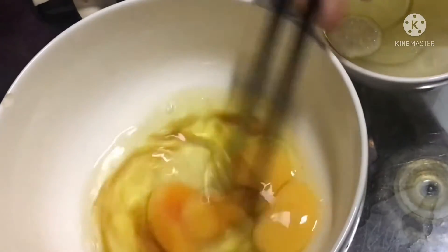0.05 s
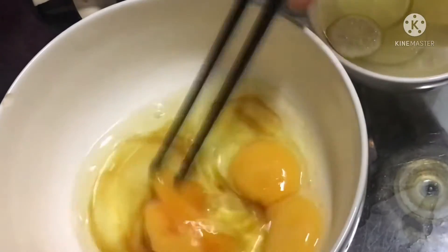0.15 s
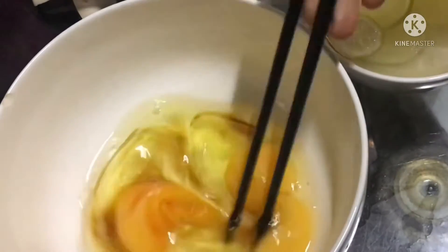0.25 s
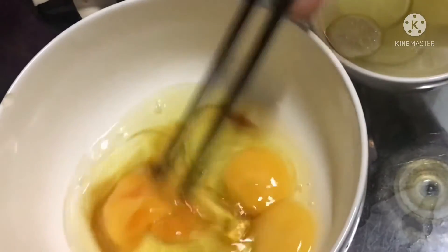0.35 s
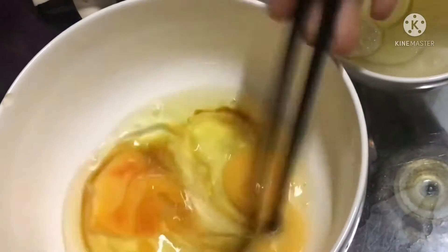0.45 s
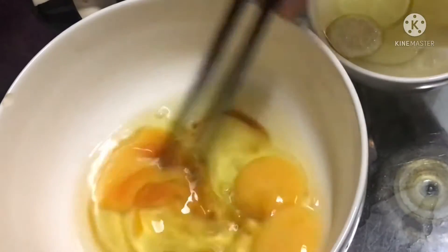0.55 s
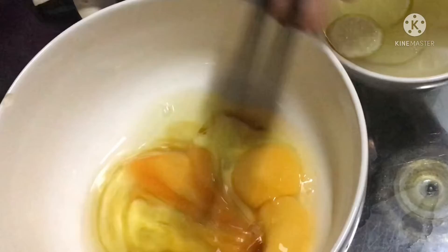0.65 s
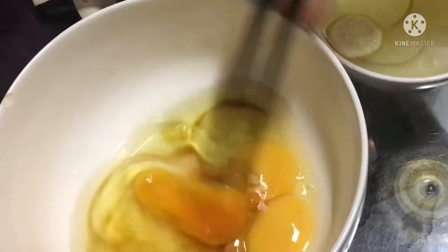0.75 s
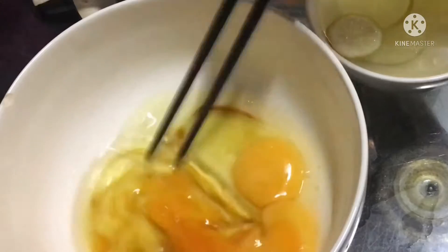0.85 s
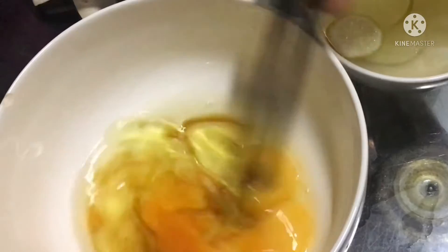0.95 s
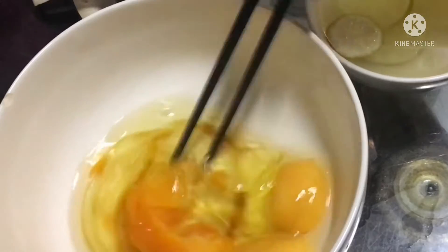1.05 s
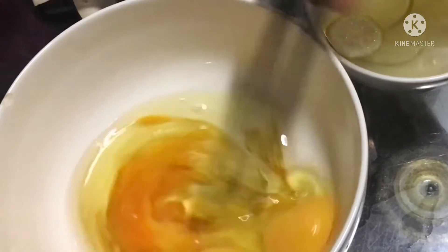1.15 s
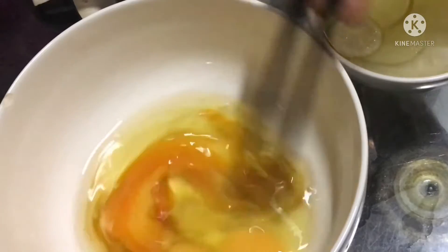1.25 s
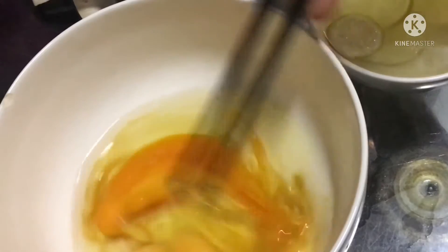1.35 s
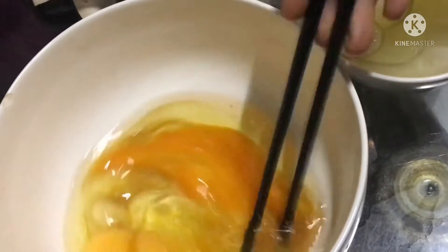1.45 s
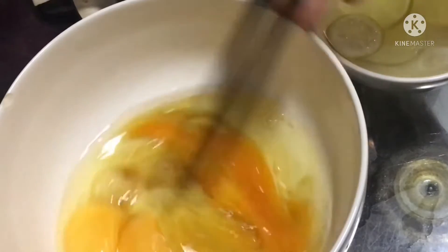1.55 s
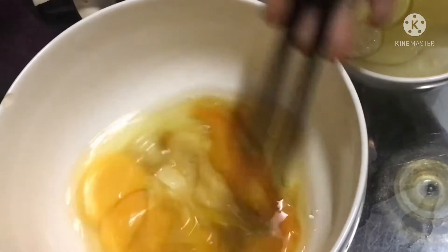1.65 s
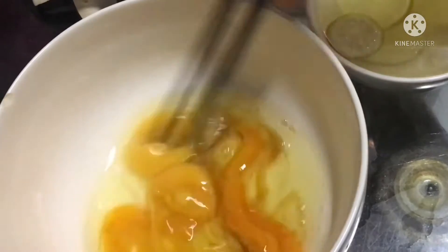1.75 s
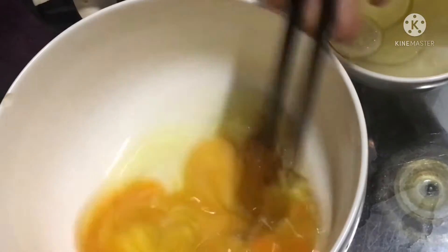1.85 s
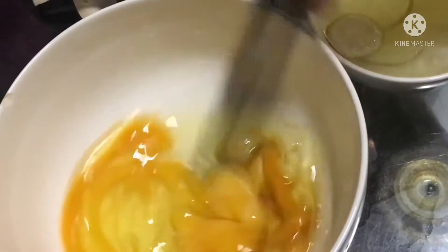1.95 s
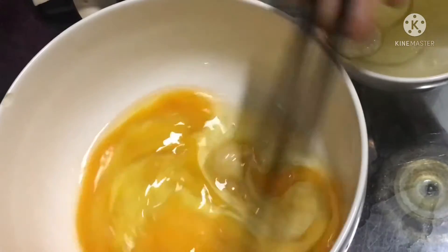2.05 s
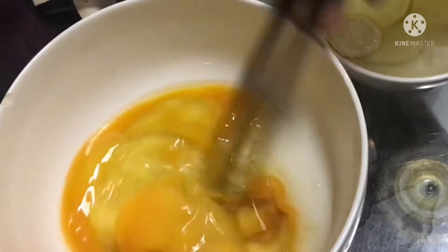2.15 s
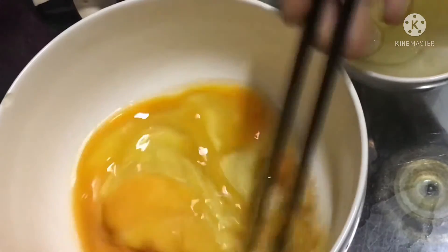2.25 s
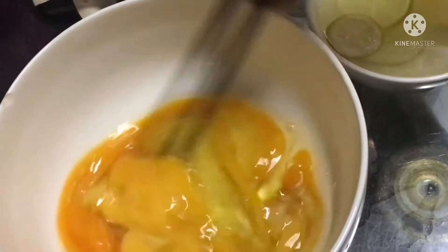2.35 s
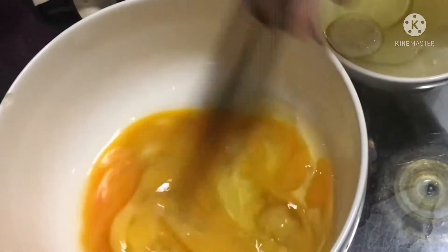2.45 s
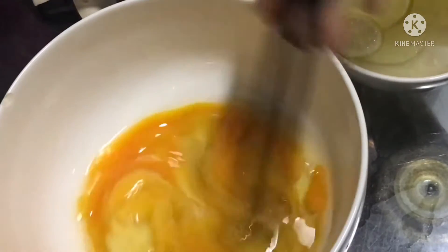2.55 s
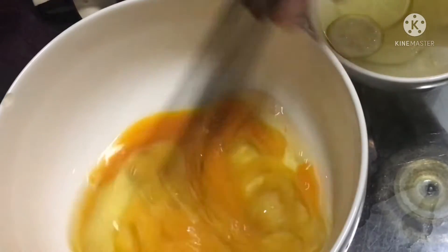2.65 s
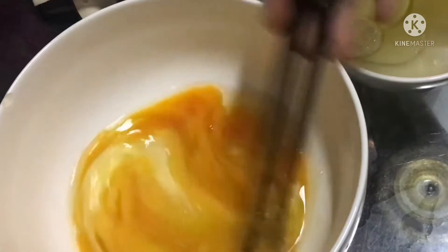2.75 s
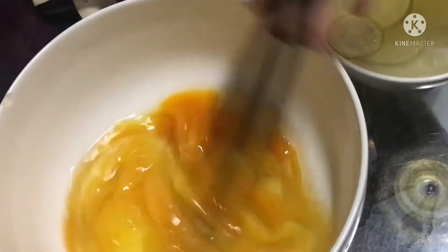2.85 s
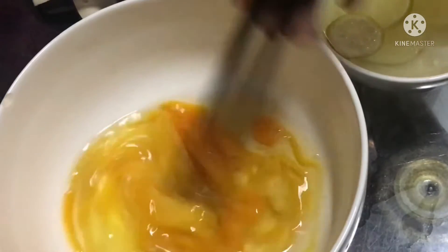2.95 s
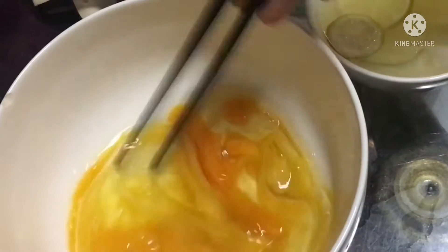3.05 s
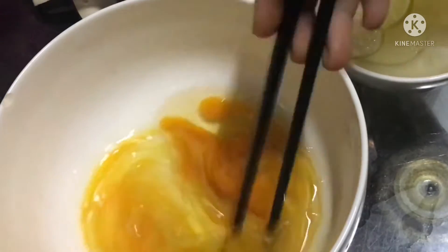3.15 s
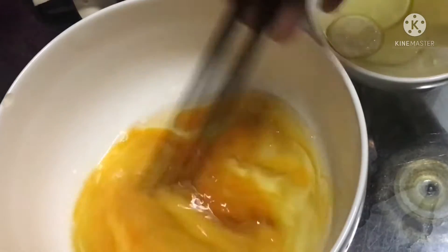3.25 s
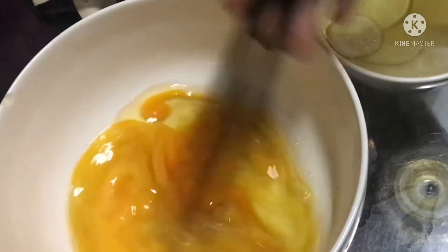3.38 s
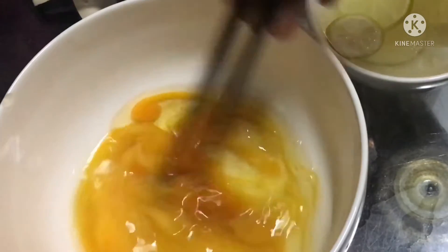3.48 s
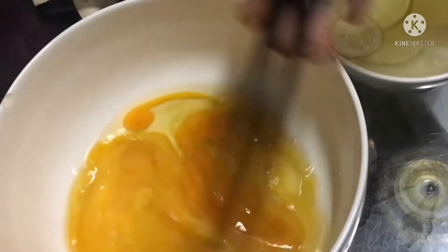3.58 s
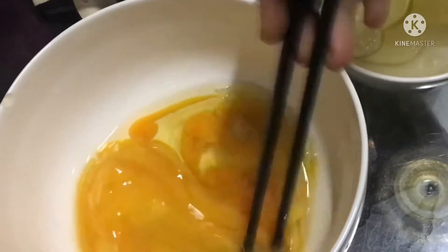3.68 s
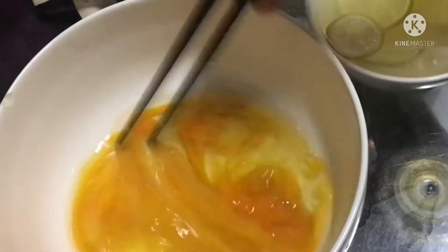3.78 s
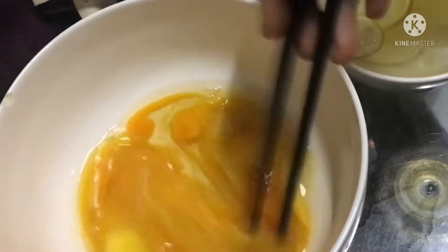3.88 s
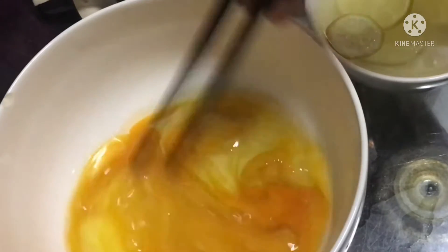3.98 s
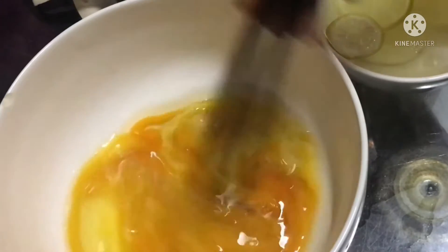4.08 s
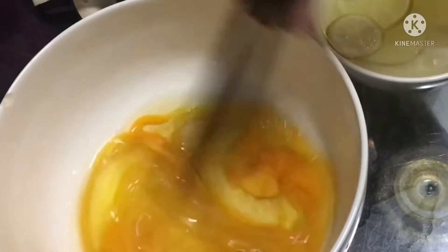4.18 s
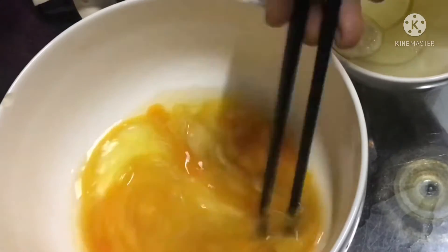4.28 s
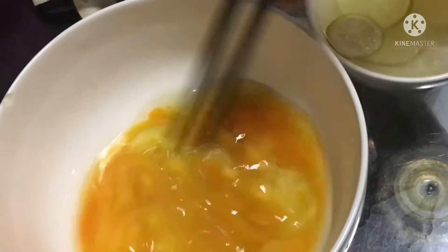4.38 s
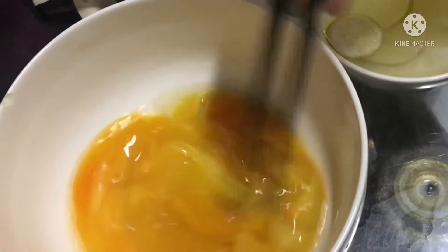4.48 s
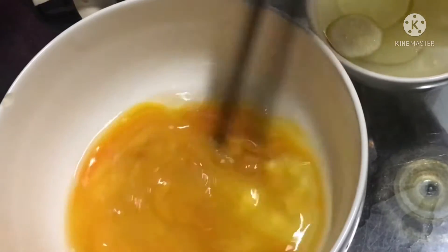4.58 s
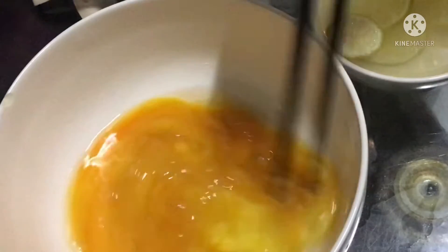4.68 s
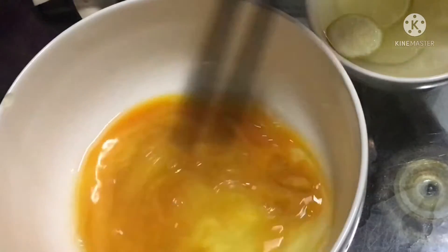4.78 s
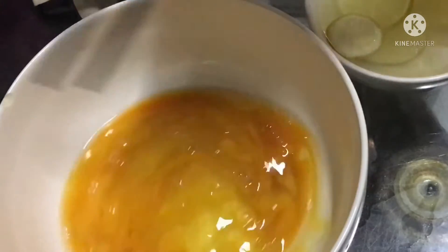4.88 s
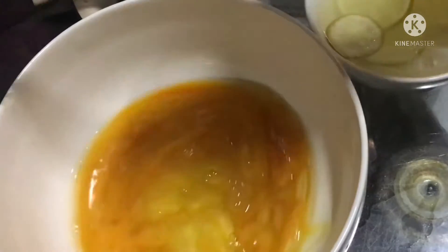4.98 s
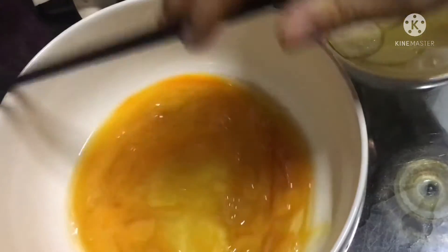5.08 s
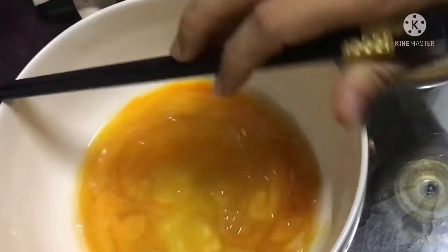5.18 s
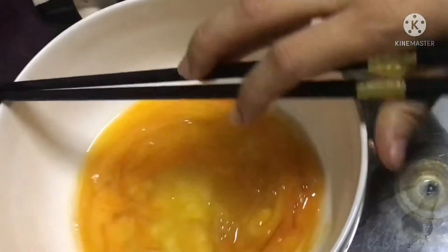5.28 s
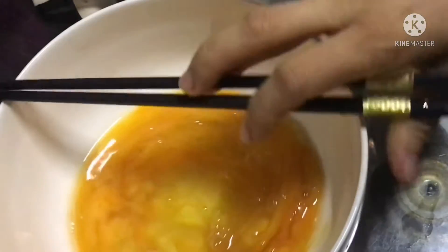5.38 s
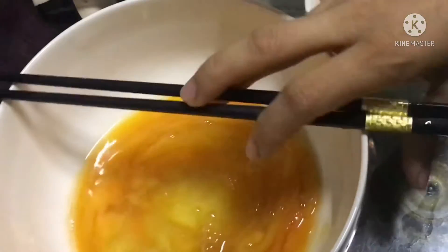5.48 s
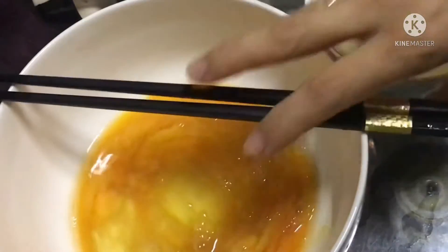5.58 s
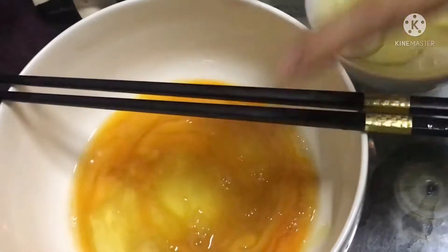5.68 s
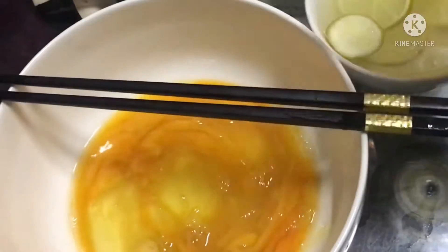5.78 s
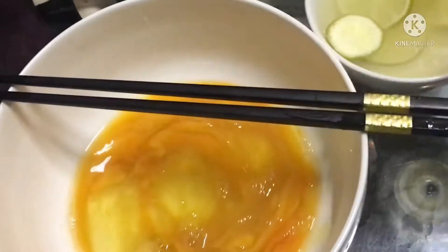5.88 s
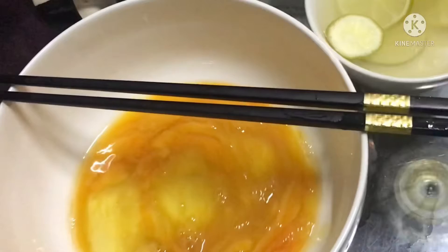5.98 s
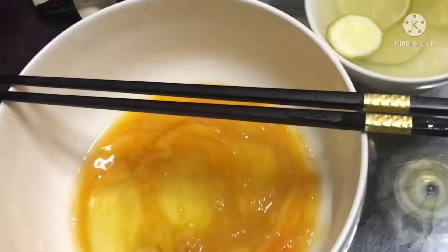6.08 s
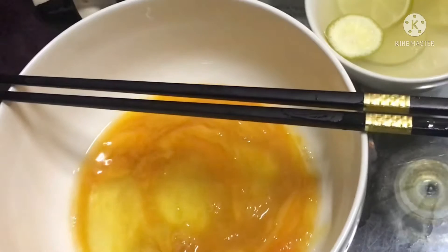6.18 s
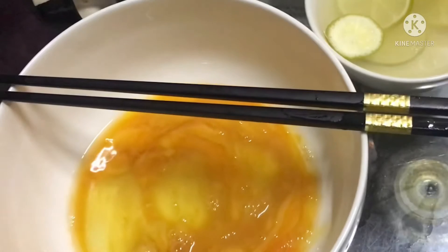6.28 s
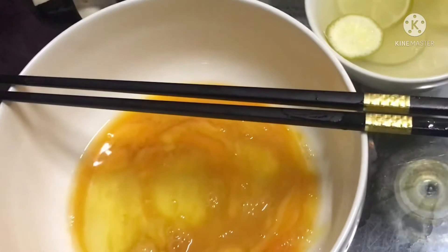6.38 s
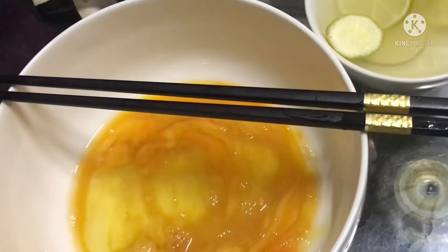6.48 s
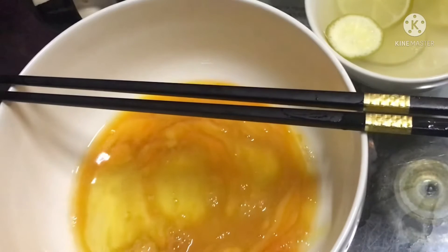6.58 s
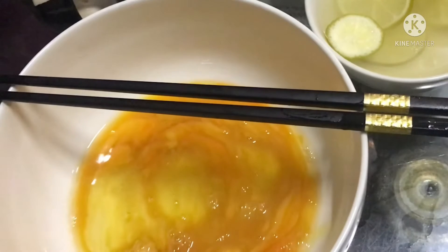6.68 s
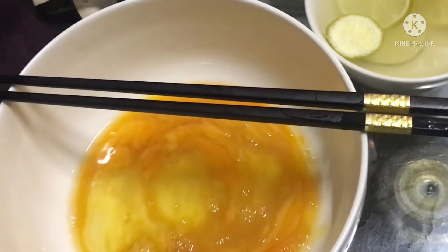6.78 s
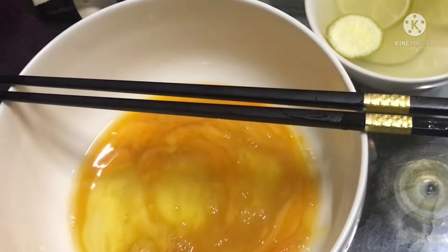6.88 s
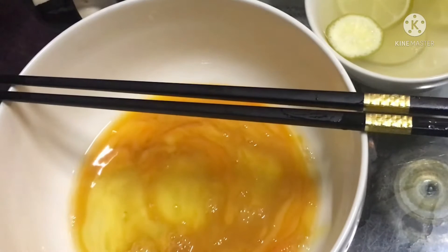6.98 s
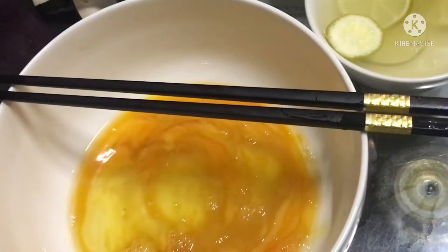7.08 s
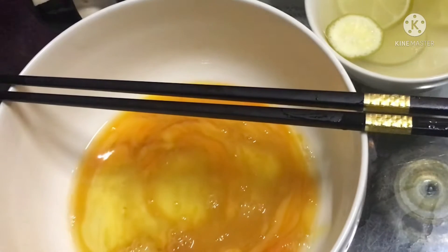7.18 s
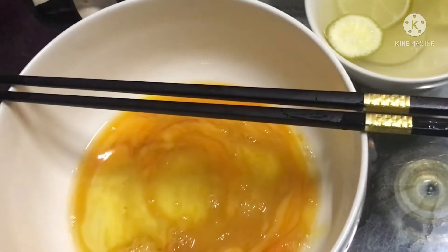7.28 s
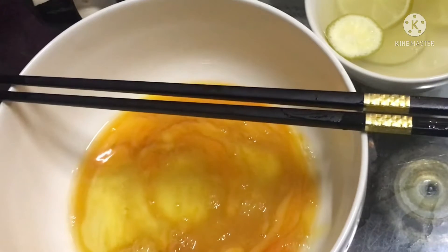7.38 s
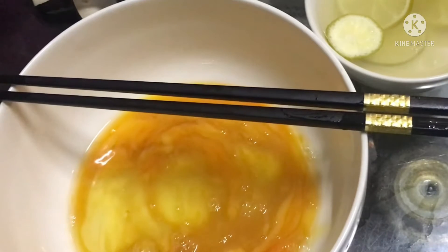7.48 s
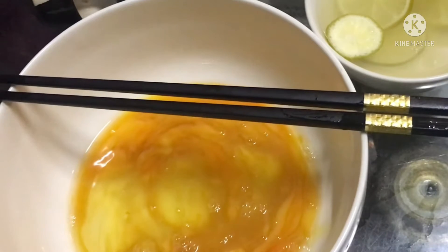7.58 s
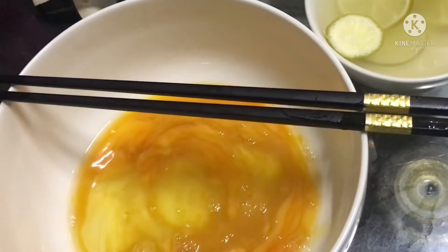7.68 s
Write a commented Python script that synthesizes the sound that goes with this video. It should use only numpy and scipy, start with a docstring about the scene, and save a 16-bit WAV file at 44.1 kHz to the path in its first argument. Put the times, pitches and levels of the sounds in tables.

```python
"""Beating eggs with chopsticks

Small kitchen, microphone close to a ceramic bowl. Two chopsticks beat five or six strokes a second,
clacking on the wall one just after the other, while bubbles plop in the egg. The sticks are then
laid across the rim. A few dull bumps follow further off; a low room hum lies under it all."""
import sys
import numpy as np
from scipy import signal
from scipy.fft import rfft, irfft
from scipy.io import wavfile
from scipy.ndimage import uniform_filter1d

SR = 44100
rng = np.random.default_rng(int(sys.argv[2]) if len(sys.argv) > 2 else 0)


def file_out(sig):
    """Save sig as 16-bit WAV at sys.argv[1]."""
    # one column per channel
    cols = np.atleast_2d(sig).T
    # limit, then scale
    lim = np.clip(cols, -1, 1)
    pcm = np.round(lim * 32767).astype(np.int16)
    wavfile.write(sys.argv[1], SR, pcm)


N = 340893
SIZE = 16384  # samples in one event
T = np.arange(SIZE) / SR
HZ = np.maximum(np.arange(SIZE // 2 + 1) * SR / SIZE, 1)

# spectrum of the room air: f/Hz, relative level/dB
ROOM_SPECTRUM = [(20, -25.5), (40, 4), (70, 2), (115, -9.5), (290, -5), (640, -8.5), (1200, -10),
                 (2000, -19.5), (3000, -26.5), (5000, -32.5), (8800, -31.5), (10500, -37.5), (12000, -34.5),
                 (16000, -43.5)]
# appliance hum: f/Hz, rms level/dB
HUM_TONES = [(42, -69.5), (141, -65), (249, -64.5), (297, -60)]
# how much egg is stirred: t/s, relative level/dB
STIRRING = [(0, -3), (2.4, 0), (4.5, 0), (4.95, -40)]
# strokes on the bowl wall; the spot they hit sets knock and edge: t/s, relative level/dB,
# second stick's lag/s, second against first/dB, hollow knock near 900 Hz/dB, edge near 6.5 kHz/dB
BEATING_STROKES = [(-.065, -13.5, .002, 0, -6.5, 3.5), (0.101, -14, .0019, 0, -5.5, -2),
                   (.277, -14, 0.0024, 1, -4.5, -4), (.446, -16.5, .0042, 1, 0.5, -7.5),
                   (0.6374, -14, 0.0052, 1, -3.5, 0.5), (.8073, -15, 0.0025, 5, -0.5, -1.5),
                   (0.9651, -12, 0.0025, -2.5, -1, -1.5), (1.1293, -12, .0052, 3, 0, -0.5),
                   (1.3026, -12, 0.0019, -9, 2, -4.5), (1.482, -13.5, 0.0041, 2.5, -3.5, -1),
                   (1.664, -18, .001, 2, 0.5, 1), (1.8476, -15.5, 0.0047, -5.5, 2, 6.5),
                   (2.0391, -12, 0.0034, 3, -6, -1.5), (2.228, -19, 0.00091, -7.5, 2.5, -5.5),
                   (2.419, -13, 0.0047, -1.5, -3.5, -2.5), (2.603, -12.5, .0018, -4, -1, 0.5),
                   (2.7913, -16, .0049, -2.5, 1, 4), (2.9865, -18, 0.0076, -6, 2.5, -2),
                   (3.175, -12, .0038, -3.5, 0.5, 2.5), (3.3551, -13.5, 0.0016, 9.5, -2.5, -0.5),
                   (3.542, -12, .0021, 0.5, -2, -0.5), (3.7269, -11.5, 0.0015, 10, -2, -2),
                   (3.9139, -10.5, 0.003, -2.5, -2.5, -4), (4.1177, -12, 0.0016, -5, 3, 4),
                   (4.3006, -13.5, 0.0011, 0.5, 3, -1), (4.4882, -15, .001, 3.5, 0, -0.5),
                   (4.6749, -9.5, 0.003, 5, 1, 1.5)]
# damped resonances of gripped sticks against the filled bowl: f/Hz, width/Hz, relative level/dB
CLACK_RESONANCES = [(382, 37, -10.5), (467, 18, 0.5), (776, 19, 0), (919.3, 33, 1), (1001, 34.5, 4),
                    (1594, 36, -15.5), (1633, 90, -1), (2245, 374, -1.5), (2507, 43, -5), (3213, 470, -14),
                    (3573, 444, 2), (4370, 470, -6.5), (5850, 270, -3.5), (6650, 520, 3), (8080, 450, -2),
                    (9025, 182, -2), (11020, 1000, -9), (12540, 2200, -17), (15000, 240, -4.5)]
# ringing modes of the bowl: f/Hz, relative level/dB, t60/s
BOWL_MODES = [(901, -5, .18), (1005, -5, .21), (1637, -10, .25), (2164, -10, .16), (2227, -3, .2),
              (2363, -12, .2), (2520, -10, .16), (3100, -11, .15), (3520, -11, .14), (3833, -13, .2),
              (4000, -13, .2), (4330, -12, .21), (6358, -12, .18), (6611, -12, .22), (6760, -11, .22),
              (8230, -14, .22), (9200, -12, .22), (9362, -13, .2)]
# spectrum of a wet smack: f/Hz, relative level/dB
SMACK_SPECTRUM = [(400, -28.5), (1200, 3.5), (3500, -1.5), (4400, 4.5), (5100, -6), (7000, -1.5),
                  (10000, -10.5), (16000, -11.5)]
# the larger air pockets in the egg: t/s, relative level/dB, f/Hz
AIR_POCKETS = [(0.5048, -23, 1604), (.5154, -25, 4080), (0.543, -32.5, 3500), (1.0983, -30, 3950),
               (1.7626, -30, 3560), (1.943, -21.5, 3570), (2.2897, -23, 945), (2.3366, -22, 1630),
               (2.3718, -28.5, 1910), (2.5072, -23.5, 3150), (2.73, -19.5, 1940), (2.941, -31.5, 3370),
               (3.2482, -14, 3336), (3.4565, -15, 1870), (3.4584, -20, 3190), (3.6105, -21, 1070),
               (3.6714, -32, 1370), (3.77, -12, 3180), (4.1953, -20, 1045), (4.3785, -28, 1300)]
# sticks grazing the wall and each other on the way back: t/s, relative level/dB, stick's ring peak/dB
RETURN_GRAZES = [(1.4295, -38, -47), (1.7211, -30, -17), (2.0824, -25.5, -11.5), (2.4847, -32, -28.5),
                 (2.657, -23.5, -21.5), (2.848, -23.5, -20), (3.4053, -29.5, -25), (3.5964, -24, -21),
                 (3.7711, -23, -29), (3.9712, -22.5, -27), (4.1824, -28, -43), (4.38, -28, -30)]
# sticks laid on the rim and settling, and last a faint high tick at 7.3 s: t/s, relative level/dB, hardness/dB
RIM_LANDINGS = [(5.184, -32, -2), (5.215, -25, 4), (5.2442, -31.5, 5.5), (5.268, -34.5, 1),
                (5.431, -51, -19.5), (5.4868, -29.5, -1.5), (5.4955, -33, -3), (5.51, -29.5, -6.5),
                (5.517, -38.5, -12.5), (5.527, -37.5, -15.5), (5.671, -54.5, -19), (5.7127, -56, -23),
                (7.293, -63, 6)]
# resonances of loose sticks on the rim: f/Hz, width/Hz, relative level/dB
RIM_RESONANCES = [(628, 12, 11), (765, 13, 6), (947, 290, 0.5), (1600, 460, 1), (2150, 51, 4.5),
                  (2950, 104, 3.5), (4180, 620, -0.5), (5380, 150, 4), (6400, 720, 0), (8230, 1940, 0),
                  (9200, 850, -12), (12800, 3500, -8.5)]
# bending modes of a loose chopstick: f/Hz, relative level/dB, t60/s
STICK_MODES = [(745, -8, .35), (1604, 0, .28), (2869, -6, .24), (4377, -3, .21), (5400, -10, .18),
               (6132, -8, .15), (8059, -5, .17), (9432, -10, .13)]
# dull bumps away from the microphone: t/s, relative level/dB, bass/dB
FAR_BUMPS = [(6.371, -46, -6), (6.425, -39, -10), (6.452, -26, -6), (6.484, -33.5, 8.5), (6.525, -32, 5),
             (6.609, -34, -2), (6.785, -44, 7.5), (7.036, -42.5, 2), (7.123, -49.5, -15)]
# spectrum of a bump: f/Hz, relative level/dB
BUMP_SPECTRUM = [(40, -30), (70, -10), (150, -7.5), (370, -5), (460, -6), (600, -5), (950, -5), (1500, -9),
                 (2500, -16), (4000, -18), (6000, -21.5), (7500, -24.5), (10000, -31), (16000, -39)]


def undb(db):
    return 10 ** (np.asarray(db) / 20)


def unit_rms(x):
    return x / np.sqrt(np.mean(x ** 2))


def fade(t60):
    """Exponential decay by 60 dB in t60 seconds."""
    return np.exp(-np.log(1000) * T / t60)


def add(out, s, x):
    """Mix x into out from time s on."""
    i = int(s * SR)
    x, i = x[max(-i, 0):], max(i, 0)
    out[i:i + len(x)] += x[:max(len(out) - i, 0)]


def curve(points, hz):
    """Gain at hz along points of f/Hz, level/dB."""
    f, db = np.transpose(points)
    return undb(np.interp(np.log(hz), np.log(f), db))


def noise(spectrum, size):
    """Noise of rms 1 with the given spectrum."""
    hz = np.maximum(np.arange(size // 2 + 1) * SR / size, 1)
    return unit_rms(irfft(rfft(rng.standard_normal(size)) * curve(spectrum, hz), size))


def drift(rate_hz):
    """Slow random movement with a spread near 1."""
    knots = rng.standard_normal(int(N / SR * rate_hz) + 2)
    return np.interp(np.arange(N) / SR * rate_hz, np.arange(len(knots)), knots)


def room_tone(air_db, tick_db, tick_hz):
    """All around the microphone: room air, a wavering appliance hum and faint electrical ticking."""
    t = np.arange(N) / SR
    air = undb(air_db + .5 * drift(12)) * noise(ROOM_SPECTRUM, N)
    hum = sum(undb(db + 2 * drift(4)) * np.sqrt(2) * np.sin(2 * np.pi * hz * t + drift(5))
              for hz, db in HUM_TONES)
    pulses = np.exp(-((t * tick_hz - .11) % 1 - .5) ** 2 / .004)
    hiss = noise([(4000, -22.5), (5500, -7.5), (6500, -17.5), (7800, -8), (9200, -3.5),
                  (10400, -26.5), (11800, -12), (14000, -14.5)], N)
    return air + hum + undb(tick_db) * pulses * hiss


def slosh(wash_db):
    """A soft, uneven wash while the egg is stirred."""
    wash = noise([(200, -29.5), (700, -1), (1600, -16), (4000, -.5), (9000, 2.5), (16000, -19.5)], N)
    stir_db = np.interp(np.arange(N) / SR, *np.transpose(STIRRING))
    return undb(wash_db + stir_db + 4.3 * drift(25)) * wash


def chatter(contact_s, scatter_db=-4, scatter_t60=.027):
    """Spectrum of one contact: the tip chatters briefly and the sound scatters inside the bowl."""
    envelope = np.exp(-(T / contact_s) ** 4) + undb(scatter_db) * fade(scatter_t60)
    push = rfft(rng.standard_normal(SIZE) * envelope)
    return push / np.sqrt(uniform_filter1d(abs(push) ** 2, size=300))


def strikes(contacts, resonances, modes, gain_db, ring_db, contact_s, bass_db, air_db,
            body_wander=.014, ring_wander=0, ring_db_per_s=0):
    """Each contact (t/s, level/dB, body/dB, edge/dB, top/dB) knocks and rings, varying with the spot."""
    out = np.zeros(N)
    centre, width, resonance_db = np.transpose(resonances)[:, :, None]
    mode_hz, mode_db, mode_t60 = np.transpose(modes)[:, :, None]
    decays = undb(mode_db) * fade(mode_t60)
    # a small body radiates little bass, and the soft tip little of the highest treble
    radiation = curve([(620, bass_db), (750, 0), (9400, 0), (13000, air_db)], HZ)
    for s, db, body_db, edge_db, top_db in contacts:
        knock_hz = centre * (1 + body_wander * rng.standard_normal(centre.shape))
        gain = undb(resonance_db + 1.8 * rng.standard_normal(centre.shape))
        knock = np.sum(gain / (1 + 1j * (HZ / knock_hz - knock_hz / HZ) * knock_hz / width), axis=0)
        spot, detune, phase = rng.standard_normal((3, len(modes), 1))
        ring_hz = mode_hz * (1 + ring_wander * detune)
        swing = np.sin(2 * np.pi * (ring_hz * T + phase))
        ring = np.sum(undb(3 * spot) * decays * swing, axis=0)
        response = chatter(contact_s) * knock + undb(ring_db + ring_db_per_s * s) * rfft(ring)
        colour = curve([(1100, body_db), (2600, 0), (4700, 0),
                        (5800, edge_db), (7100, edge_db), (8200, top_db)], HZ)
        hit = irfft(response * colour * radiation)
        add(out, s, undb(db + gain_db) * hit[:SIZE * 3 // 4])
    return out


def clacks():
    """Close up, two sticks share each stroke: the first ticks thinly, the second drives the wall."""
    contacts = []
    for s, db, lag_s, second_db, knock_db, edge_db in BEATING_STROKES:
        first_db = db - 10 * np.log10(1 + undb(second_db) ** 2)
        contacts.append((s, first_db, knock_db - 5.5, edge_db, 2))
        contacts.append((s + lag_s, first_db + second_db, knock_db + 1.7, edge_db, .81))
    # swirling egg loads the wall unevenly, so pitches wander; as it coats the wall it muffles the ring
    return strikes(contacts, CLACK_RESONANCES, BOWL_MODES, gain_db=30, ring_db=-46, contact_s=.0024,
                   bass_db=-7.5, air_db=-5.5, ring_wander=.007, ring_db_per_s=-1.7)


def worktop_thumps(gain_db, hz, t60):
    """Each stroke rocks the bowl, which thuds faintly on the worktop."""
    out = np.zeros(N)
    for s, db, *_ in BEATING_STROKES:
        add(out, s, undb(db + gain_db) * np.sin(2 * np.pi * hz * T) * fade(t60))
    return out


def smack(t60):
    """A film of egg snaps: a very short wet click."""
    return noise(SMACK_SPECTRUM, size=1024) * fade(t60)[:1024]


def bubble(hz, glide, cycles=46):
    """A pocket of air swells in about two cycles, rings briefly and rises in pitch near the surface."""
    t60 = cycles / hz
    t = T[:int(t60 * SR) + 1]
    swell = 1 - np.exp(-(t * hz / 2) ** 2)
    return np.sin(2 * np.pi * hz * t * (1 + glide * t / t60)) * swell * fade(t60)[:len(t)]


def splatter(drop_db, fizz_db, spread_s, drops_per_stroke):
    """Egg thrown up by each stroke falls back as tiny ticks and bubbles, louder as the egg loosens."""
    out = np.zeros(N)
    for s, *_ in BEATING_STROKES:
        stir_db = np.interp(s, *np.transpose(STIRRING))
        for when, pitch, size in rng.random((drops_per_stroke, 3)):
            landing_s = s + .021 + spread_s * when ** 2
            gain = undb(stir_db + 14 * size ** 2)
            add(out, landing_s, gain * undb(drop_db) * smack(t60=.013))
            add(out, landing_s, gain * undb(fizz_db) * bubble(hz=2000 * 3 ** pitch, glide=.1))
    return out


def dips(dip_db, spread_db, lead_s):
    """A faint wet tick as the tips enter the egg, just before they meet the wall."""
    out = np.zeros(N)
    for s, *_ in BEATING_STROKES:
        early, size = rng.uniform(-1.2, 1, 2)
        add(out, s - lead_s * (1 + early / 2), undb(dip_db + spread_db * size) * smack(t60=.006))
    return out


def plops(ring_db, squelch_db, smack_db):
    """Pockets of air open behind the sticks with a smack, squelch around their own pitch and ring."""
    out = np.zeros(N)
    for s, db, hz in AIR_POCKETS:
        squelch = noise([(hz / 2, -25), (hz, 0), (hz * 2, -12), (hz * 4, -35)], size=2048)
        add(out, s, undb(db + ring_db) * bubble(hz, glide=.04))
        add(out, s, undb(db + squelch_db) * squelch * fade(t60=.025)[:2048])
        add(out, s, undb(.45 * db + smack_db) * smack(t60=.028))  # grows more slowly than the ring
    return out


def grazes(stick_hz, stick_t60):
    """Light touches on the return swing ring the bowl and one finger-damped bending mode of a stick."""
    contacts = [(s, db, 0, 0, -1) for s, db, _ in RETURN_GRAZES]
    out = strikes(contacts, CLACK_RESONANCES, BOWL_MODES, gain_db=30, ring_db=-50, contact_s=.0041,
                  bass_db=-2, air_db=-8, ring_wander=.007)
    for s, _, stick_db in RETURN_GRAZES:
        add(out, s, undb(stick_db) * np.sin(2 * np.pi * stick_hz * T) * fade(stick_t60))
    return out


def rim_taps():
    """Loose sticks bounce on the rim: the harder they land, the more treble and the less body. A faint high
    tick follows later."""
    contacts = [(s, db, -.8 * hard_db, hard_db, .77 * hard_db - 1.5) for s, db, hard_db in RIM_LANDINGS]
    return strikes(contacts, RIM_RESONANCES, STICK_MODES, gain_db=35.5, ring_db=-42.5, contact_s=.0015,
                   bass_db=-6, air_db=-4.5)


def distant_bumps(rise_s, t60):
    """Far knocks reach the microphone as soft-edged thuds, mostly room sound."""
    out = np.zeros(N)
    envelope = fade(t60) * (1 - np.exp(-T / rise_s))
    for s, db, bass_db in FAR_BUMPS:
        shelf = curve([(250, bass_db), (900, 0)], HZ)
        thud = irfft(rfft(noise(BUMP_SPECTRUM, SIZE)) * shelf)
        add(out, s, undb(db) * thud * envelope)
    return out


def kitchen(x, tail_db, low_t60, high_t60, delay_s, early_db, early_t60):
    """Worktop and near walls answer first, then a short diffuse tail that dulls as it fades."""
    low = signal.sosfilt(signal.butter(2, 3500, fs=SR, output="sos"), rng.standard_normal(SIZE))
    high = signal.sosfilt(signal.butter(2, 3500, "high", fs=SR, output="sos"), rng.standard_normal(SIZE))
    tail = unit_rms(low * fade(low_t60) + high * fade(high_t60))
    early = unit_rms(rng.standard_normal(SIZE) * fade(early_t60))
    echo = np.zeros(SIZE)
    add(echo, delay_s, (undb(tail_db) * tail + undb(early_db) * early) / np.sqrt(SIZE))
    return x + signal.fftconvolve(x, echo)[:N]


def scene():
    """One microphone: sticks, bowl and egg up close, bumps and room tone behind them."""
    sticks = clacks() + worktop_thumps(gain_db=-34.5, hz=140, t60=.17)
    sticks += grazes(stick_hz=4390, stick_t60=.016) + rim_taps()
    egg = plops(ring_db=3, squelch_db=-9, smack_db=-25)
    egg += dips(dip_db=-47, spread_db=8, lead_s=.018)
    egg += splatter(drop_db=-49.5, fizz_db=-48, spread_s=.067, drops_per_stroke=24)
    egg += slosh(wash_db=-64)
    near = kitchen(sticks + egg, tail_db=-16, low_t60=.33, high_t60=.24,
                   delay_s=.0055, early_db=-12.5, early_t60=.045)
    far = distant_bumps(rise_s=.0017, t60=.31) + room_tone(air_db=-50.5, tick_db=-60, tick_hz=29.61)
    return (near + far)[None]


def record(dry):
    """The recorder clips at full scale; the top rolls off from 15.4 kHz and is cut at 16.5 kHz."""
    clipped = np.clip(dry, -1, 1)
    softened = signal.sosfilt(signal.butter(6, 15400, fs=SR, output="sos"), clipped)
    return signal.sosfilt(signal.ellip(8, .2, 70, 16500, fs=SR, output="sos"), softened)


dry = scene()
out = record(dry)
file_out(out)
```